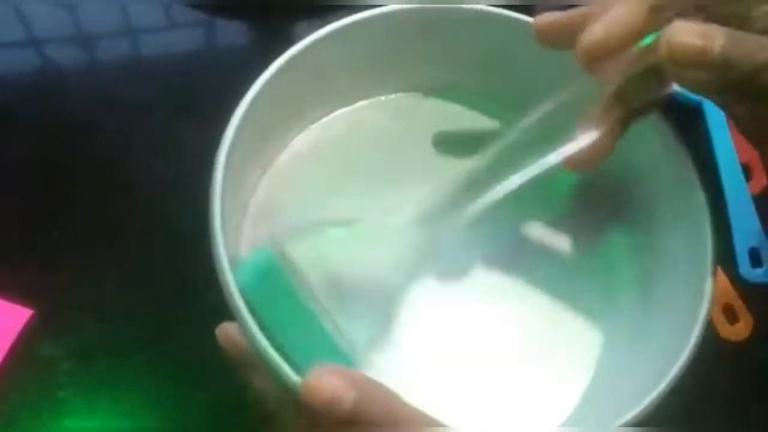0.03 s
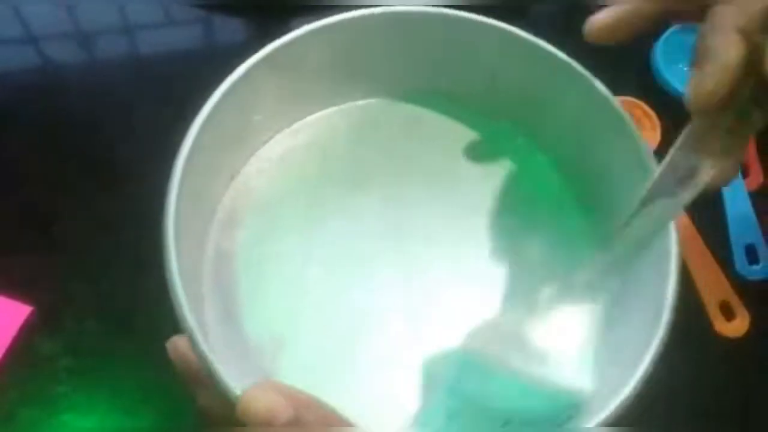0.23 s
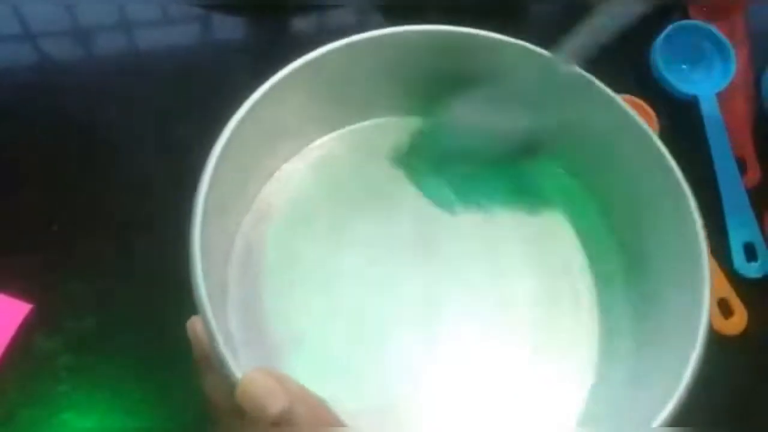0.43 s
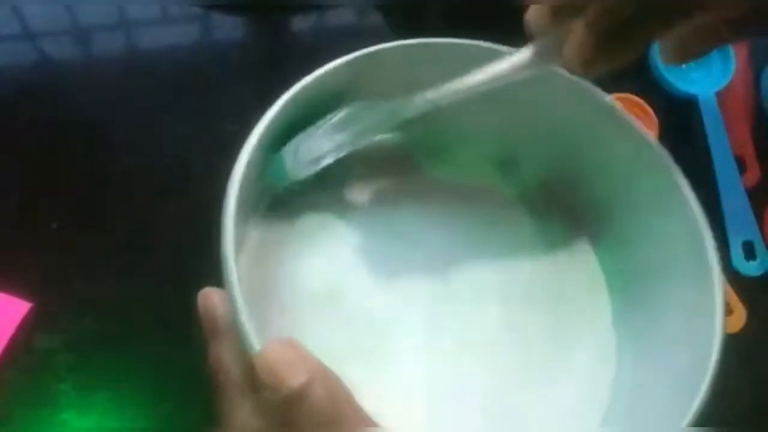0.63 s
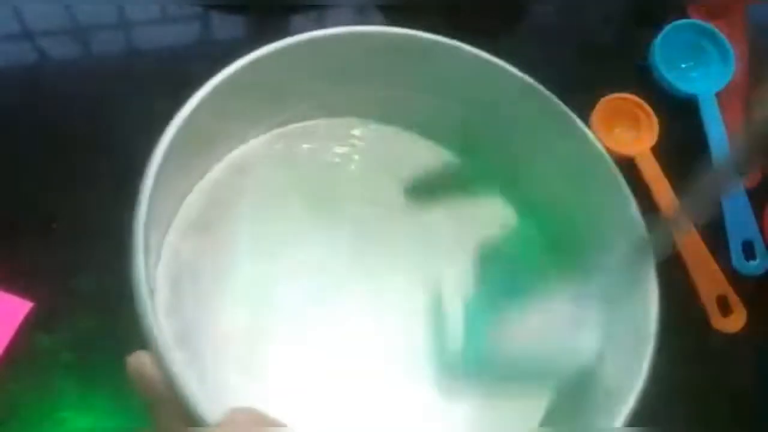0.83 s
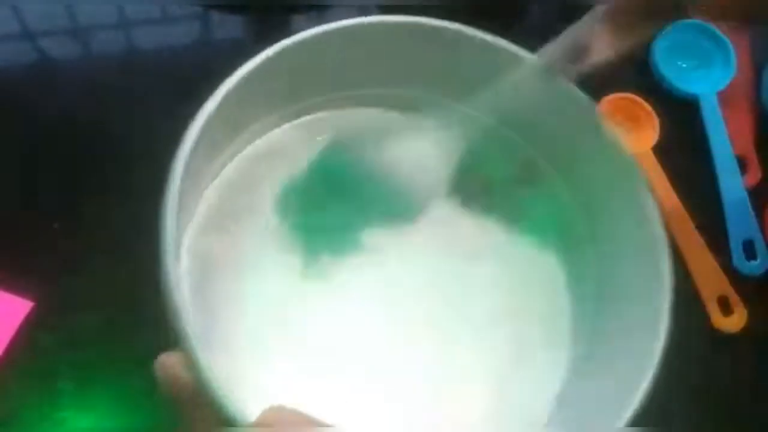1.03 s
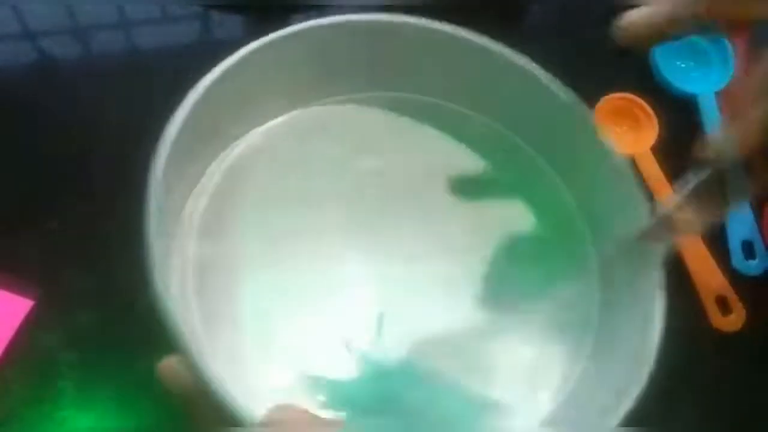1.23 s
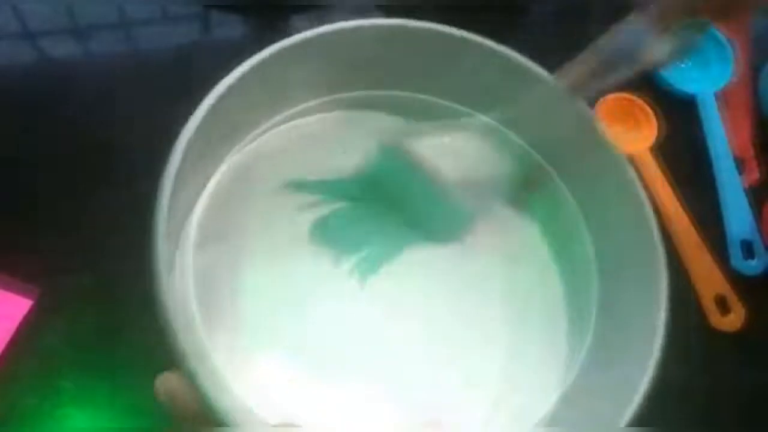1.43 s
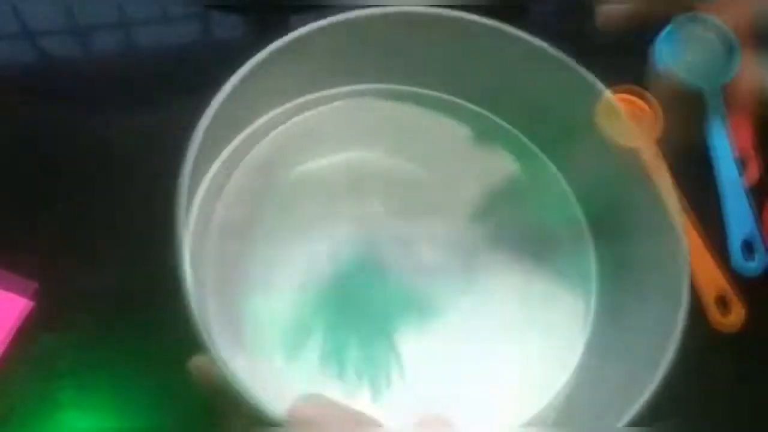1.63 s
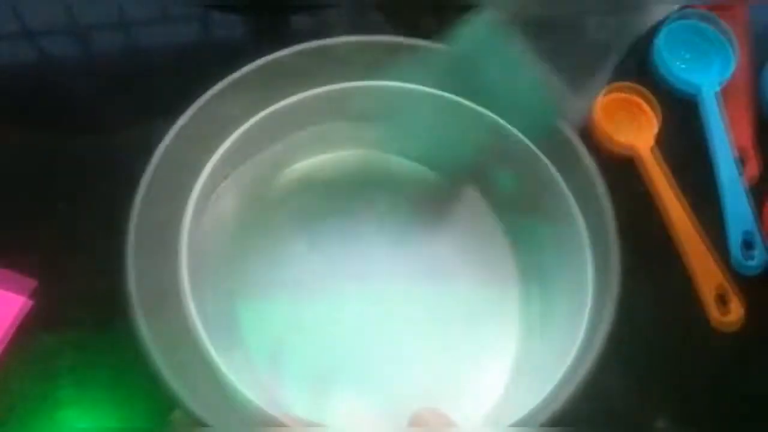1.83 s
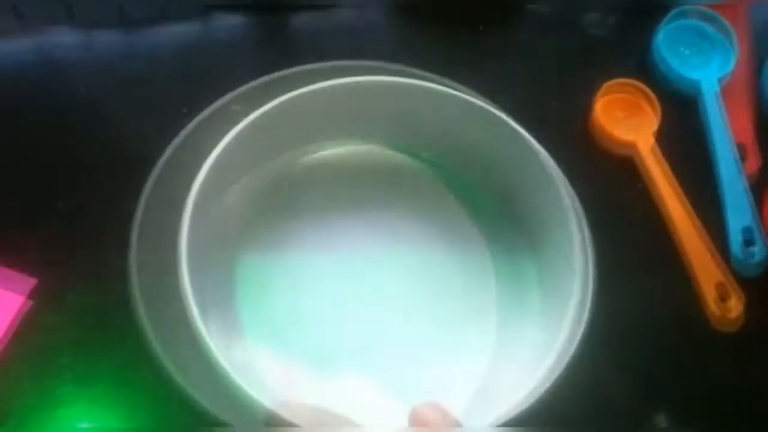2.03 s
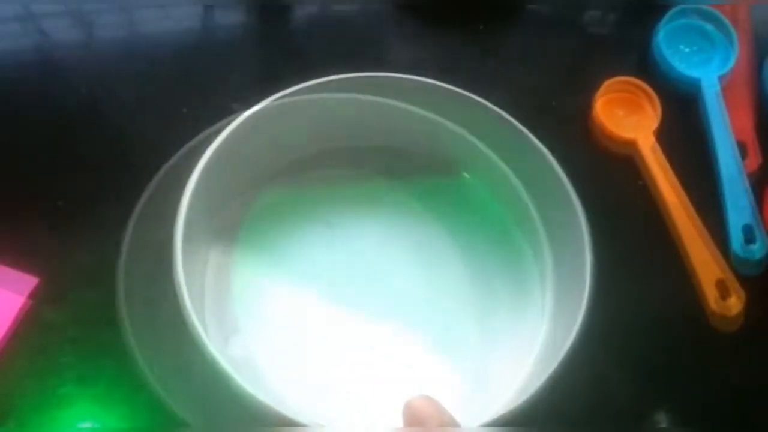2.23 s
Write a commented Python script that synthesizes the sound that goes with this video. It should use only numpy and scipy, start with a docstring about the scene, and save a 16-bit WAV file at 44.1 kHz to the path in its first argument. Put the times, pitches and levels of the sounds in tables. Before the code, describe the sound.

A brush scrapes twice round the inside of a metal cake tin, knocking and squeaking so the metal rings. Soft strokes fade, then the tin is set down on the counter, close by in a quietly humming kitchen.

```python
"""A brush is swept twice round the inside of a metal cake tin, close by in a small kitchen.
It knocks on the wall, then catches and slips in a bright scrape with a squeak, making the metal ring.
A second scrape follows with a fainter squeak, then soft strokes that die away.
At the end the tin is set down on the counter and nudged.
All along the kitchen rumbles and hums quietly, and the left microphone hears little treble."""
import sys
import numpy as np
from scipy import signal
from scipy.fft import rfft, irfft
from scipy.io import wavfile
from scipy.ndimage import uniform_filter1d, minimum_filter1d

SR = 44100
rng = np.random.default_rng(int(sys.argv[2]) if len(sys.argv) > 2 else 0)


def to_wav(sig):
    """Store sig (one row per channel, or 1-D mono) as 16-bit WAV at the path in sys.argv[1].

    Samples outside -1..1 are clipped; the rate is SR.
    """
    pcm = np.clip(np.atleast_2d(sig), -1, 1) * 32767
    pcm = np.round(pcm).astype(np.int16)
    wavfile.write(sys.argv[1], SR, pcm.T)  # frames by channels


N = 105840
T = np.arange(N) / SR
RING_T = T[:N // 6]  # time since a tap, in seconds


def tin():
    """Brush and counter shake the tin: its thin wall sounds bright, its whole body sounds lower."""
    grit, bristles = slips(spread_db=5.5), slips(spread_db=2)
    rub_wall, rub_body = rubbing(grit, bristles)
    knock_snap, knock_wall, knock_body = brush_knocks()
    bump_snap, bump_wall, bump_body = counter_bumps()
    bright = travelling(rub_wall + knock_wall + bump_wall, wall_response)
    bright += knock_snap + bump_snap + squeaks()
    body = travelling(rub_body + knock_body, body_response)
    body += through(bump_body, body_response(on_base=True))
    return bright, body + rasps(grit)


# How hard the brush presses in the two scrapes, one list each: time_s, force_db
SCRAPE_FORCES = [
    [(.207, -23.5), (.238, -23.5), (.278, -27), (.29, -18), (.318, -17.5), (.352, -13), (.366, -12.5),
     (.374, -25), (.393, -26), (.41, -36), (.49, -43.5), (.56, -57)],
    [(.60, -54.5), (.655, -32), (.68, -53.5), (.69, -21), (.745, -23.5), (.763, -21), (.78, -15),
     (.80, -25), (.815, -33), (.86, -42), (.93, -52)],
]
# How hard it presses in the soft strokes: time_s, force_db
STROKE_FORCE = [(0, -39.5), (.12, -51), (.19, -52), (.58, -58.5), (.92, -46), (1.0, -48.5), (1.04, -53),
                (1.13, -50.5), (1.18, -40.5), (1.25, -47), (1.42, -54), (1.61, -51), (1.72, -61),
                (1.85, -70.5), (1.92, -58.5), (2.0, -64.5), (2.13, -72.5), (2.4, -54)]


def rubbing(grit, bristles):
    """Pressing harder makes the slips stronger; returns the push on the wall and on the body."""
    hard = sum(curve(scrape) for scrape in SCRAPE_FORCES)
    soft = curve(STROKE_FORCE)
    wall = hard * grit + soft * bristles
    body = undb(-30) * hard ** 0.93 * grit  # the body grows more slowly than the hiss
    body += undb(-15.5) * soft * bristles
    return wall, body


def slips(spread_db, slips_per_s=5000, judder_db=1.2):
    """Bristles catch and let go: tiny clicks of uneven size that come in juddering bunches."""
    clicks = (rng.random(N) < slips_per_s / SR) * rng.choice([-1, 1], N)
    clicks = clicks * undb(spread_db * rng.standard_normal(N) + judder_db * wander(390))
    return clicks / clicks.std()


# The brush hitting the wall: start_s, tick_db, body_db, chatter_decay_s, hardness_db
BRUSH_KNOCKS = [(.2062, -5, -27, 0.0013, -3.5), (.2140, -15, -39.5, 0.0036, -2.5),
                (.2215, -16.5, -31.5, 0.0053, -8.5), (.2305, -24.5, -39, 0.001, -4.5),
                (.4665, -28.5, -51.5, 0.0017, 5), (.6345, -43, -55.5, 0.00046, 2),
                (.6615, -31, -50, .004, 13), (.6850, -12, -45.5, 0.00078, 8),
                (.6935, -28, -38.5, 0.0016, 11.5), (.7518, -13, -57, 0.0028, 17),
                (.8840, -51.5, -68, 0.0031, -5), (.9622, -34.5, -50.5, 0.003, 6),
                (.9790, -56, -49.5, 0.0017, -24), (1.1394, -14.5, -36.5, 0.00017, 11.5),
                (1.1470, -20.5, -43, 0.001, 2), (1.2715, -32.5, -58, .001, -3)]


def brush_knocks():
    """The brush knocks against the wall on its way round."""
    return blows(BRUSH_KNOCKS)


# Squeaks of the brush: peak_s, pitch_hz, level_db, fade_s
BRUSH_SQUEAKS = [(0.305, 7760, -14.5, 0.01), (.308, 10350, -21, .008), (.783, 2640, -34, 0.0076)]


def squeaks(waver=0.0027):
    """The brush locks on to one note of the tin: a short, wavering tone swells and fades."""
    sound = np.zeros(N)
    for peak_s, pitch_hz, level_db, fade_s in BRUSH_SQUEAKS:
        swell = np.exp(-np.abs(T - peak_s) / fade_s)
        sound += undb(level_db) * swell * tone(pitch_hz * (1 + waver * wander(400)))
    return sound


# Swells of dragging: peak_s, level_db, width_s
RASP_SWELLS = [(0.307, -50, 0.11), (.362, -39, .022), (0.78, -40.5, 0.04), (1.58, -66, 0.1)]
# The notes that dragging sets ringing: pitch_hz, ring_s, level_db
RASP_NOTES = [(1587, .025, -3.5), (2590, .03, -6), (3210, .04, -3.5), (3713, 0.053, 0), (3864, .04, -5),
              (4320, .03, -7), (4770, .03, -6.5), (5200, 0.034, -7.5)]


def rasps(grit):
    """The brush drags off the wall, and its slips stir up short, rough notes."""
    drag = sum(undb(level_db) * np.exp(-((T - peak_s) / width_s) ** 2 / 2)
               for peak_s, level_db, width_s in RASP_SWELLS)
    return travelling(drag * grit, lambda: ring(RASP_NOTES, spread_db=9.5))


# The base meeting the counter: start_s, tick_db, body_db, chatter_decay_s, hardness_db
COUNTER_BUMPS = [(2.2030, -31.5, -33.5, 0.0058, -1.5), (2.2380, -48.5, -45, 0.012, 0),
                 (2.3155, -38, -62, 0.0086, -6), (2.3760, -39.5, -61, 0.0087, -12),
                 (2.3880, -48, -65, 0.0055, -14)]


def counter_bumps():
    """The tin bumps the counter as it is set down and nudged."""
    return blows(COUNTER_BUMPS)


def blows(table, strike_share=0.57, snap_hz=7480, snap_s=0.00085, snap_db=-14):
    """Each blow strikes, then chatters; returns the snap and the pushes on the wall and the body."""
    snap, wall, body = np.zeros((3, 2 * N))
    size = np.sqrt(SR / 100)  # a blow holds the energy of 10 ms of steady sound
    strike = np.sqrt(strike_share) * signal.unit_impulse(len(RING_T))
    ping = unit(np.sin(2 * np.pi * snap_hz * RING_T) * np.exp(-RING_T / snap_s))
    crack = np.sqrt(strike_share) * unit(ping + unit(colour(strike, CLICK_COLOUR)))
    for start_s, tick_db, body_db, chatter_decay_s, hardness_db in table:
        burst = rng.standard_normal(len(RING_T)) * np.exp(-RING_T / chatter_decay_s)
        chatter = np.sqrt(1 - strike_share) * unit(burst)
        tilt = [(700, -hardness_db / 2), (2600, hardness_db / 2)]  # harder blows favour high notes
        span = slice(int(start_s * SR), int(start_s * SR) + len(RING_T))
        snap[span] += size * undb(tick_db + snap_db) * crack
        wall[span] += size * undb(tick_db) * chatter
        body[span] += size * undb(body_db) * colour(strike + chatter, tilt)
    return snap[:N], wall[:N], body[:N]


def travelling(force, response, places=4, step_s=0.05):
    """The brush moves from place to place, and each place rings with its own mix of notes."""
    distances = [np.abs((T / step_s - place) % places - places / 2) for place in range(places)]
    return sum(through(force * np.sqrt(np.maximum(1 - away, 0)), response()) for away in distances)


# Tone colour of a touch on the wall: pitch_hz, level_db
CLICK_COLOUR = [(300, -43), (1500, -38), (2800, -24), (3700, -20), (5300, -12), (6200, -5), (7800, 3),
                (9200, 1), (10300, 3), (12800, -3), (14500, -9), (15600, -4.5)]
# High notes of the thin wall: pitch_hz, ring_s, level_db
WALL_NOTES = [(6990, 0.064, 0.5), (7250, .1, 1), (7890, 0.13, -1), (7900, 0.14, -10), (7950, .1, -16.5),
              (8128, 0.12, 0.5), (8500, 0.12, -1.5), (8470, 0.14, -4), (8420, .1, -10.5), (9176, .1, -2),
              (9885, .08, 11), (10410, .08, -5.5), (9600, 0.093, 3), (10570, 0.13, -4.5)]


def wall_response():
    """One tap on the thin wall gives a bright click and a short ring."""
    click = noise_tail(ring_s=0.015)
    click[:, 0] += undb(-6.5)  # the sharp first instant of the touch
    ringing = undb(-5.5) * ring(WALL_NOTES, spread_db=7)
    return unit(unit(colour(click, CLICK_COLOUR)) + ringing)


# Notes of the whole tin: pitch_hz, ring_s, hit_on_wall_db, hit_on_base_db
BODY_NOTES = [(441.4, 0.31, 1, 1), (737.4, 0.077, -9.5, -10), (823, .16, -4, -6.5), (893, 0.061, -1.5, -7),
              (993, .15, -6.5, -6.5), (1058, 0.0783, 1, -10), (1248, .25, -17, -9.5), (1555, 0.5, -14, 0),
              (1795, .16, -8, -1), (2256, 0.41, -19.5, -5.5), (2278, .2, -21, 0), (2478, .24, -22.5, -7),
              (2710, .07, -16, -13), (3060, 0.21, -24, -10.5), (3380, 0.18, -16, -22), (4033, .15, -4, -12),
              (5050, .2, -28.5, -17), (5400, 0.25, -29.5, -13)]
# Tone colour of the tin's thud: pitch_hz, level_db
THUD_COLOUR = [(100, -30.5), (220, -26.5), (400, -4.5), (560, -12.5), (720, -1.5), (1000, 6.5),
               (1300, -10.5), (1750, -1), (2100, -11.5), (2550, -1), (3000, -12), (4500, -19.5),
               (9000, -41)]


def body_response(on_base=False):
    """One tap makes the whole tin thud and ring; standing free, it rings more than in the hand."""
    notes = [(hz, ring_s, base_db if on_base else wall_db) for hz, ring_s, wall_db, base_db in BODY_NOTES]
    ring_db, spread_db = (-1, 0) if on_base else (-5.5, 7)
    ringing = undb(ring_db) * ring(notes, spread_db)
    thud = unit(colour(noise_tail(ring_s=0.06), THUD_COLOUR))
    return undb(-0.5) * thud + ringing


def ring(notes, spread_db):
    """Metal rings as a set of fading pure tones, their levels scattered by spread_db."""
    sound = np.zeros((2, len(RING_T)))
    for pitch_hz, ring_s, level_db in notes:
        chance = rng.standard_normal((3, 1))
        phase = chance[:2] * min(pitch_hz / 900, 2)  # high notes differ more from left to right
        note = unit(fade(ring_s) * np.sin(2 * np.pi * pitch_hz * RING_T + phase))
        sound += undb(level_db + spread_db * chance[2]) * note
    return unit(sound)


def room_echo(bright, body, ring_s=0.37, build_s=0.093):
    """The kitchen's echo builds and dies away, stronger for the tin's body than for its bright wall."""
    echo = unit(noise_tail(ring_s) * (1 - fade(build_s)))
    return through(undb(-18) * bright + undb(-8.5) * body, echo)


# Tone colour of the kitchen's background noise: pitch_hz, level_db
AIR_COLOUR = [(12, -19), (20, 3), (27, 9), (33, -17.5), (44, -21.5), (65, -14), (120, -12), (200, -24),
              (330, -16), (470, -22.5), (700, -29), (1800, -33.5), (3100, -46), (6000, -55.5), (16000, -51)]
# How that noise slowly sinks: time_s, level_db
AIR_LOUDNESS = [(0, -44), (.5, -45.5), (1.2, -47.5), (1.7, -50), (2.4, -52.5)]


def kitchen_air(wide_above_hz=1200):
    """A low rumble, alike on both sides, with a hiss that spreads wider."""
    middle, side = colour(rng.standard_normal((2, N)), AIR_COLOUR)
    keep_highs = signal.butter(1, wide_above_hz, "high", fs=SR, output="sos")
    side = signal.sosfilt(keep_highs, side) + 0.08 * side
    return np.array([middle + side, middle - side]) / middle.std() * curve(AIR_LOUDNESS)


# Tones of the kitchen's hum: pitch_hz, level_db
HUM_TONES = [(112, -66), (339, -66.5)]


def kitchen_hum():
    """Two faint, low tones waver in level and pitch."""
    return sum(undb(db + wander(4.7)) * tone(hz + 5 * wander(38)) for hz, db in HUM_TONES)


def undb(db):
    """Turn decibels into a number to multiply by."""
    return 10 ** (np.asarray(db) / 20)


def unit(x):
    """Scale each channel to an energy of 1."""
    return x / np.sqrt(np.sum(x ** 2, axis=-1, keepdims=True))


def curve(points):
    """A level that follows (time_s, level_db) points and is silent outside them."""
    return undb(np.interp(T, *np.array(points).T, left=-200, right=-200))


def colour(x, points):
    """Turn lows and highs up or down along (pitch_hz, level_db) points."""
    hz, db = np.array(points).T
    n = x.shape[-1]
    grid_hz = np.arange(n + 1) * SR / (2 * n)
    gain = undb(np.interp(np.log(grid_hz + 1), np.log(hz), db))
    cepstrum = irfft(np.log(gain))
    cepstrum[1:n] *= 2  # folded so that nothing sounds before its cause
    cepstrum[n + 1:] = 0
    return irfft(rfft(x, 2 * n) * np.exp(rfft(cepstrum)))[..., :n]


def through(x, response):
    """Let every sample of x set off a copy of the response to one tap."""
    return signal.fftconvolve(np.atleast_2d(x), response, axes=-1)[:, :N]


def fade(ring_s):
    """Die away by 60 dB in ring_s seconds."""
    return np.exp(-np.log(1000) * RING_T / ring_s)


def noise_tail(ring_s):
    """Countless close notes dying together, different at each microphone."""
    return unit(rng.standard_normal((2, len(RING_T))) * fade(ring_s))


def wander(turns_per_s):
    """A random drift of about 1 either way."""
    return np.interp(T * turns_per_s, np.arange(N // 10), rng.standard_normal(N // 10))


def tone(pitch_hz):
    """A pure tone of power 1 that follows a changing pitch."""
    return np.sqrt(2) * np.sin(2 * np.pi * np.cumsum(pitch_hz) / SR)


# How well each microphone hears lows and highs: pitch_hz, gain_db
LEFT_MIC = [(300, -1), (1100, 3.5), (1800, 0), (2600, 4), (3500, -1), (4500, -12.5), (7000, -19.5),
            (16000, -20.5)]
RIGHT_MIC = [(300, -3.5), (1100, -1), (1800, 2), (2600, 0), (3500, 3.5), (16000, -0.5)]


def scene():
    """The tin and its echo as each microphone hears them, over the quiet kitchen."""
    bright, body = tin()
    left, right = bright + body + room_echo(bright, body)
    return np.array([colour(left, LEFT_MIC), colour(right, RIGHT_MIC)]) + kitchen_air() + kitchen_hum()


def record(dry, ceiling=0.75, react_s=0.00033, top_hz=15650):
    """A fast limiter holds down the loudest peaks, and the highest treble is cut."""
    window = int(react_s * SR) + 1
    needed_gain = ceiling / np.maximum(np.abs(dry).max(axis=0), ceiling)
    gain = uniform_filter1d(minimum_filter1d(needed_gain, 2 * window), window)
    return signal.sosfilt(signal.ellip(10, .2, 80, top_hz, fs=SR, output="sos"), dry * gain)


dry = scene()
out = record(dry)
to_wav(out)
```